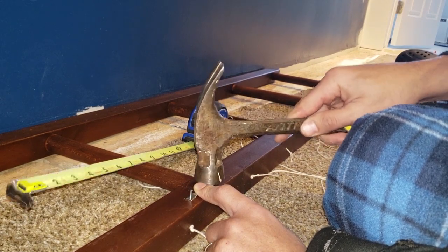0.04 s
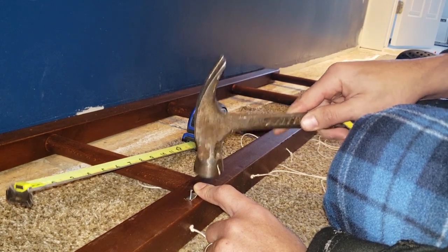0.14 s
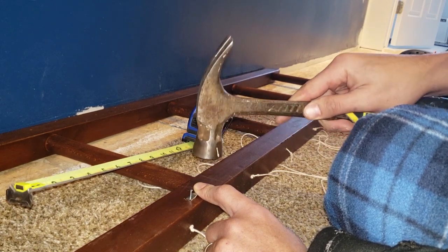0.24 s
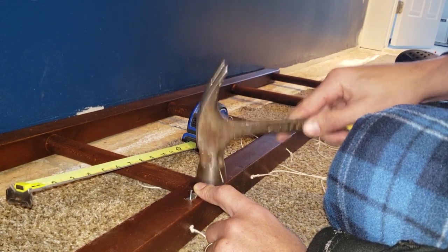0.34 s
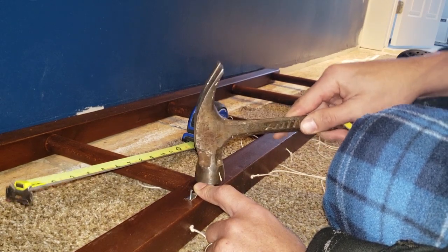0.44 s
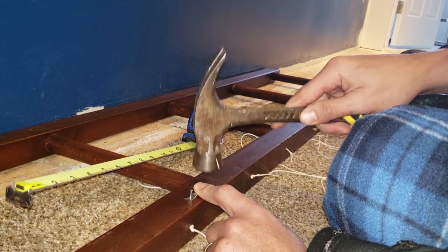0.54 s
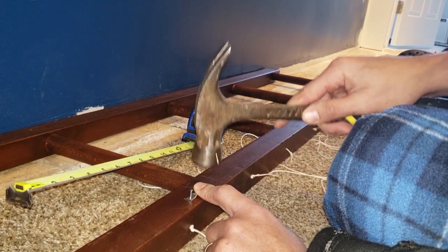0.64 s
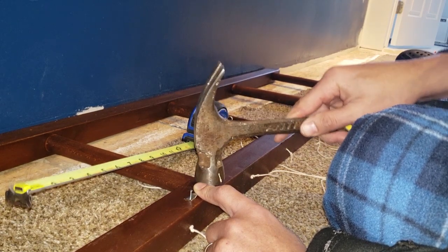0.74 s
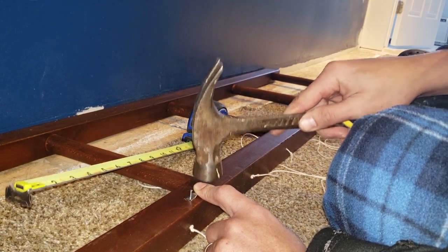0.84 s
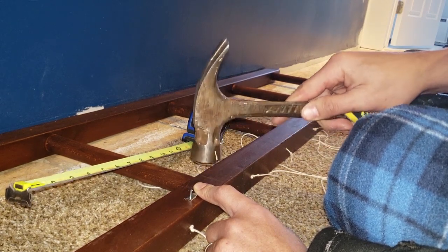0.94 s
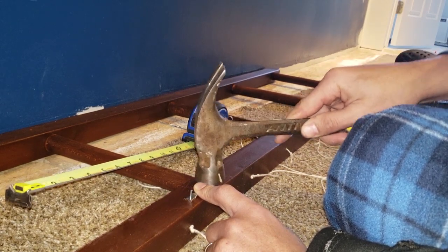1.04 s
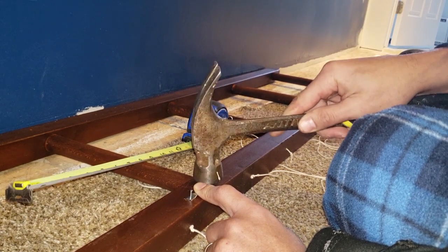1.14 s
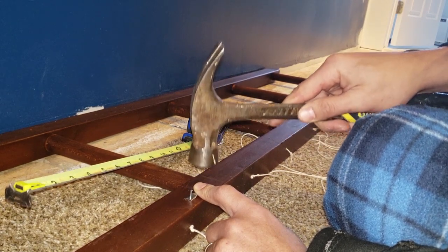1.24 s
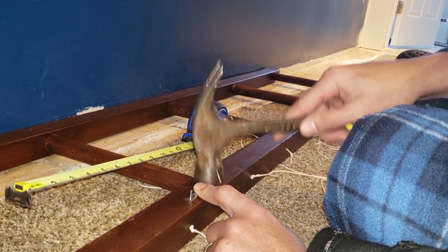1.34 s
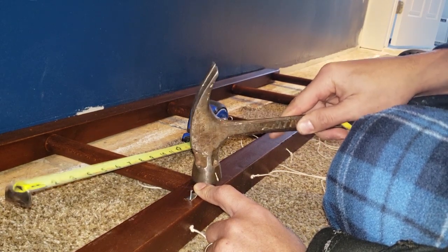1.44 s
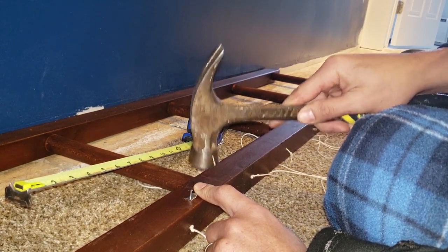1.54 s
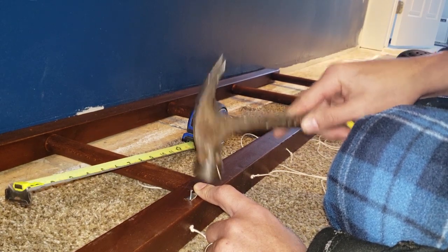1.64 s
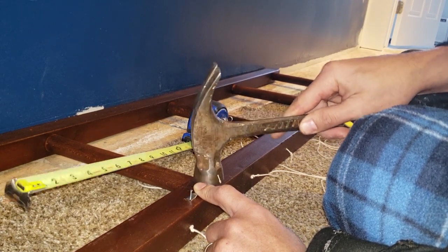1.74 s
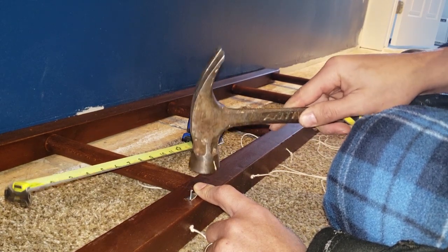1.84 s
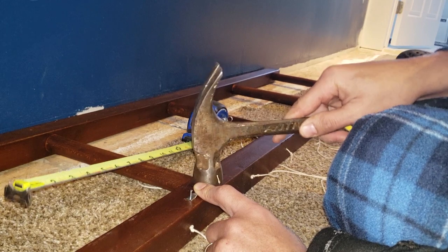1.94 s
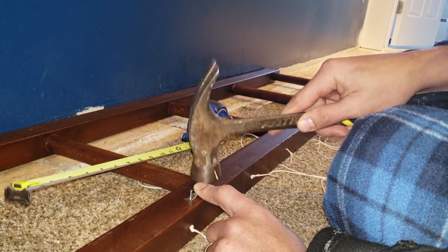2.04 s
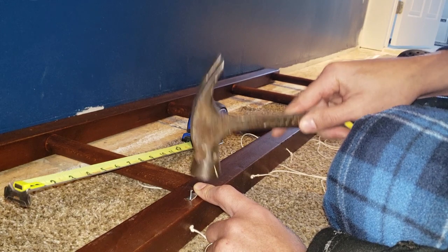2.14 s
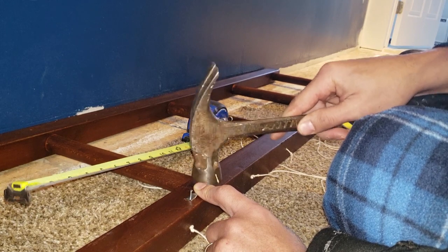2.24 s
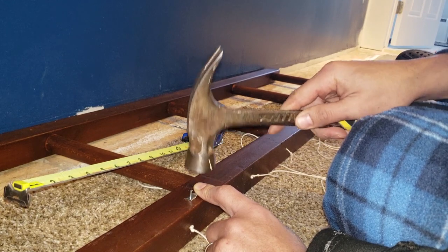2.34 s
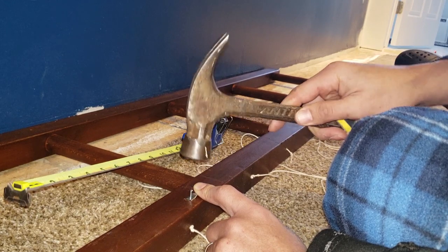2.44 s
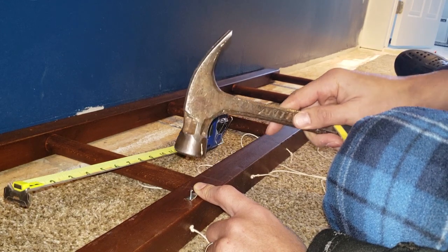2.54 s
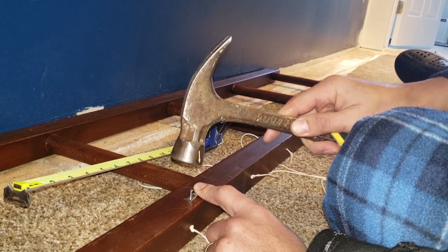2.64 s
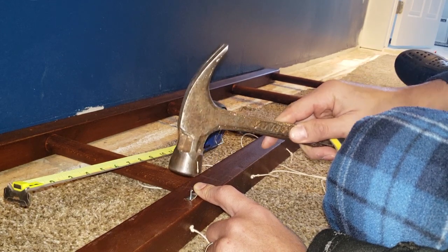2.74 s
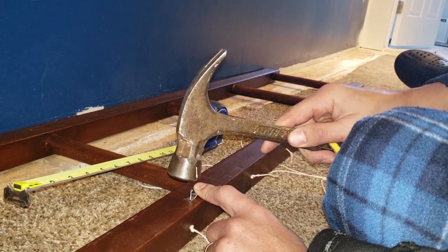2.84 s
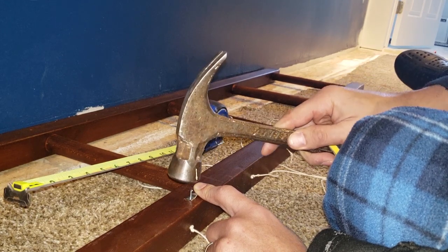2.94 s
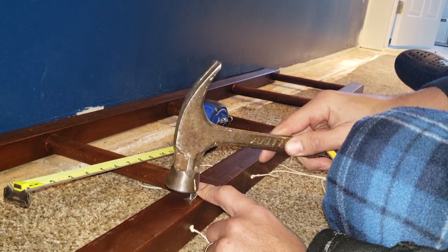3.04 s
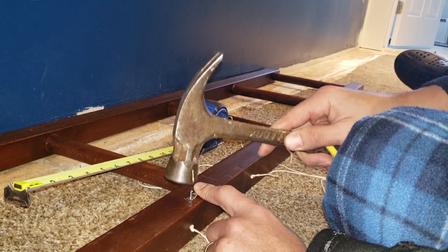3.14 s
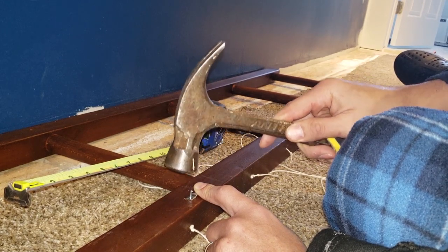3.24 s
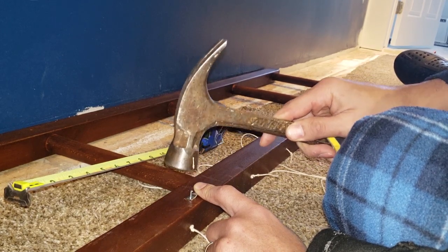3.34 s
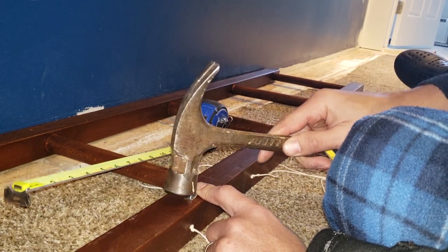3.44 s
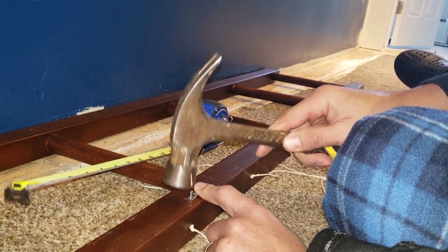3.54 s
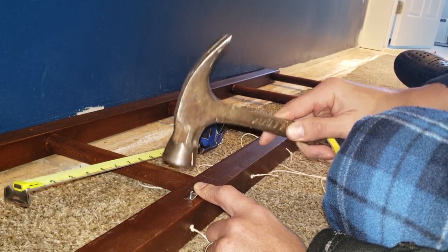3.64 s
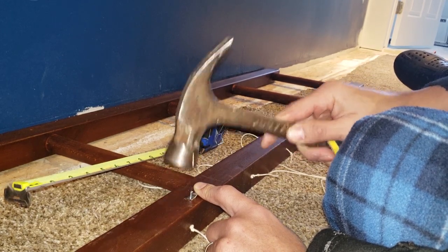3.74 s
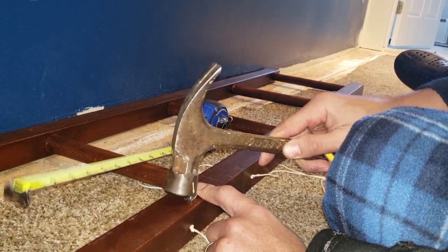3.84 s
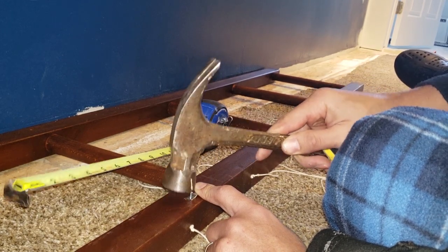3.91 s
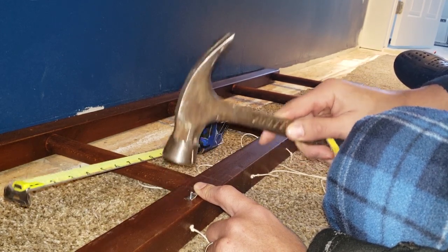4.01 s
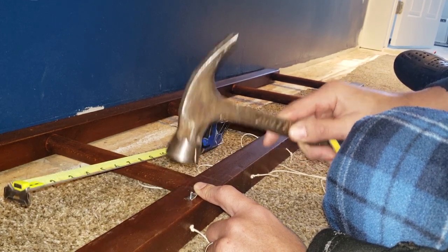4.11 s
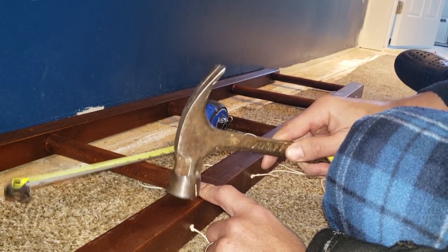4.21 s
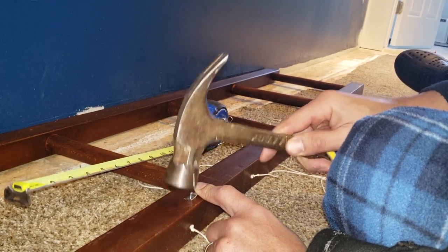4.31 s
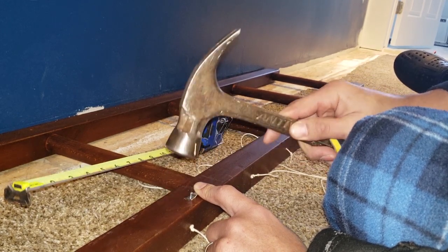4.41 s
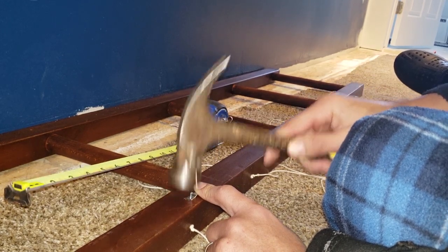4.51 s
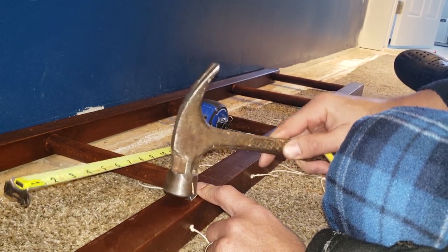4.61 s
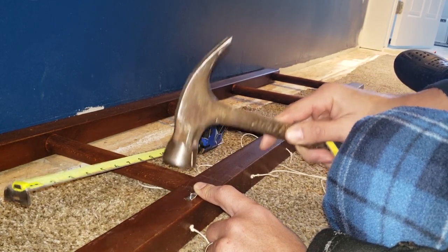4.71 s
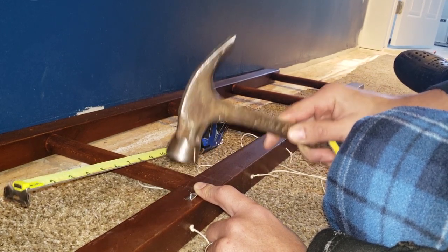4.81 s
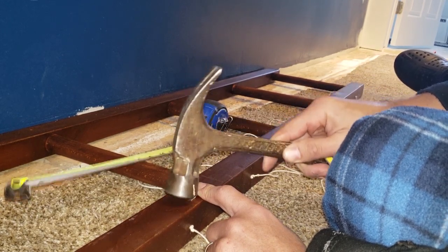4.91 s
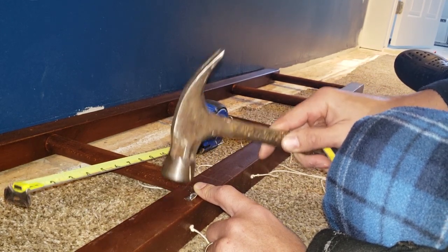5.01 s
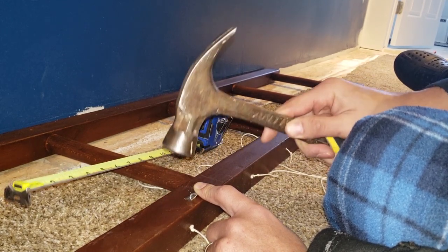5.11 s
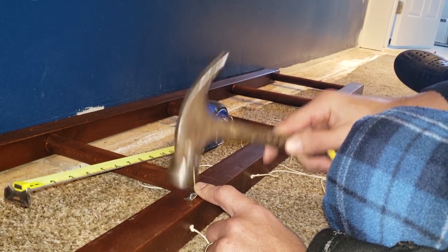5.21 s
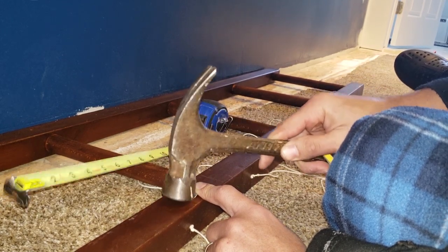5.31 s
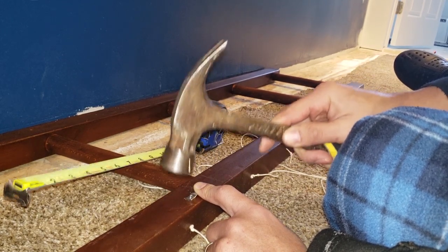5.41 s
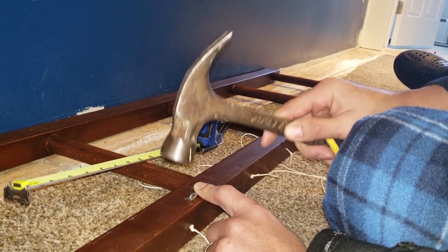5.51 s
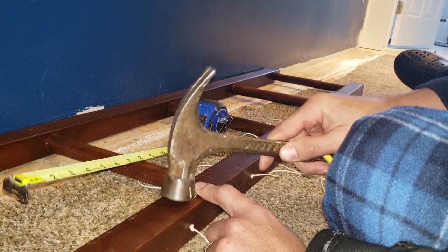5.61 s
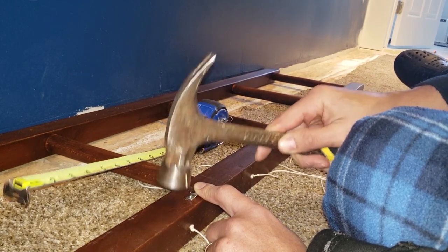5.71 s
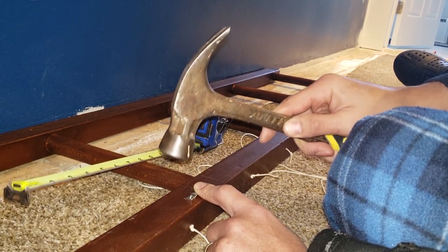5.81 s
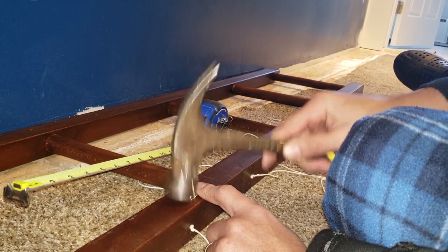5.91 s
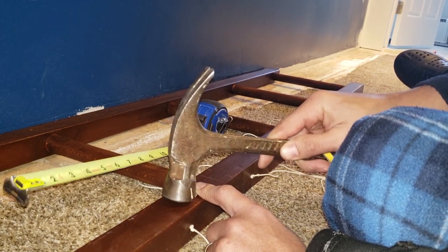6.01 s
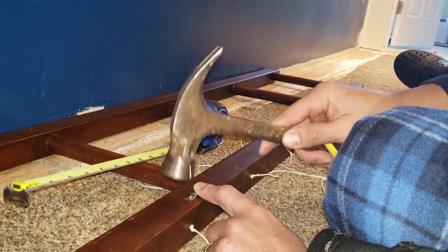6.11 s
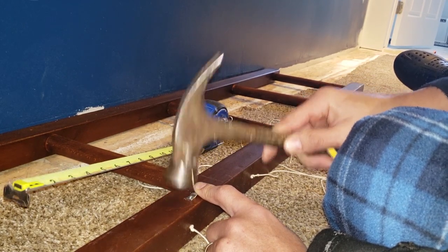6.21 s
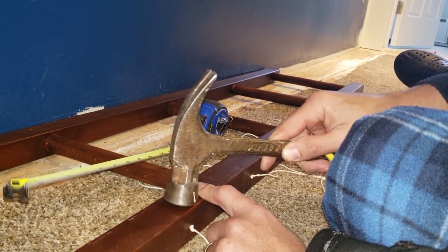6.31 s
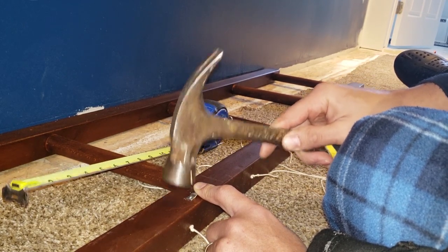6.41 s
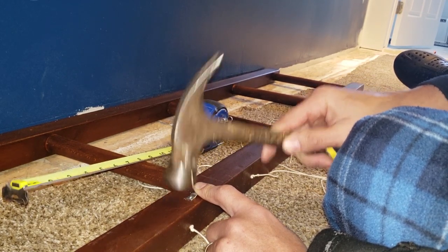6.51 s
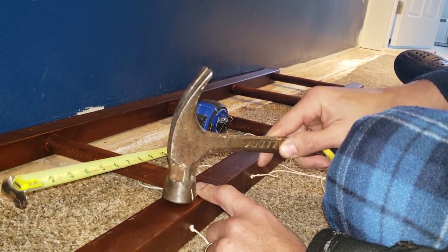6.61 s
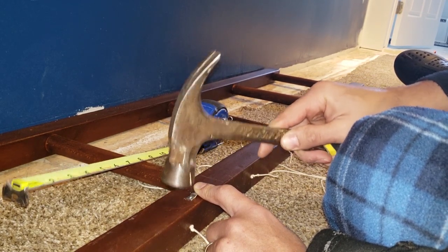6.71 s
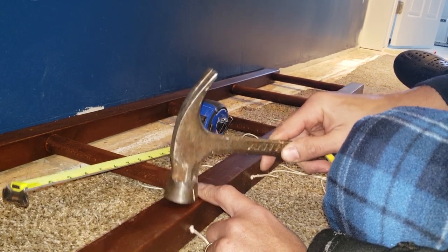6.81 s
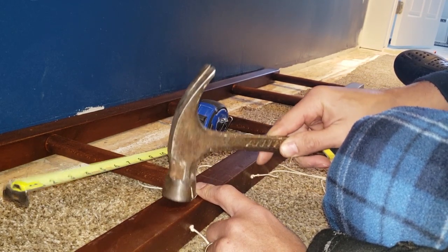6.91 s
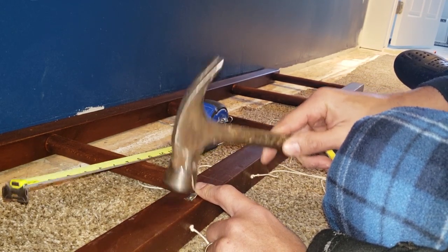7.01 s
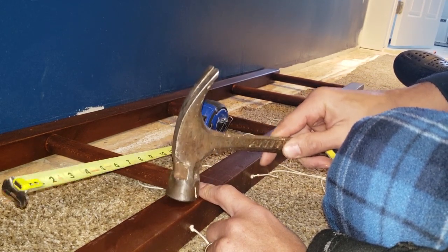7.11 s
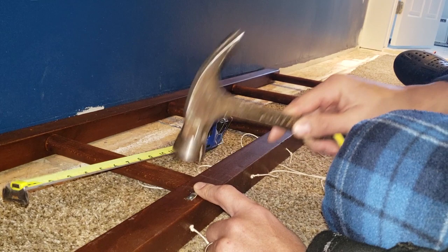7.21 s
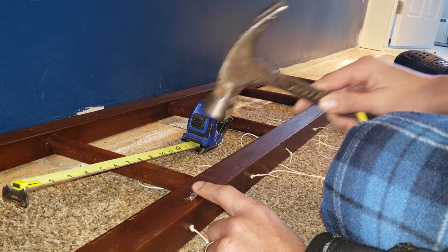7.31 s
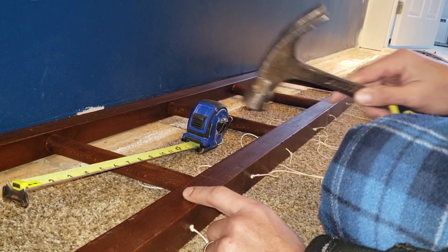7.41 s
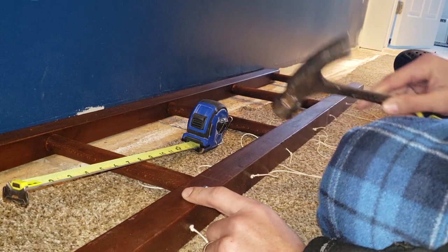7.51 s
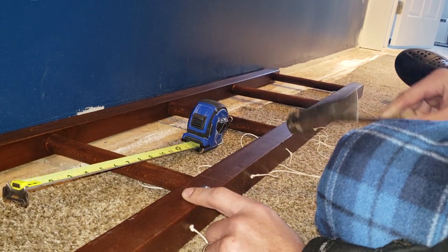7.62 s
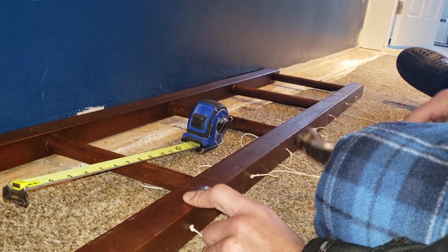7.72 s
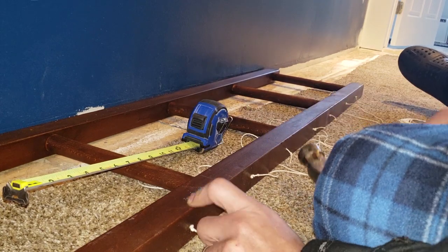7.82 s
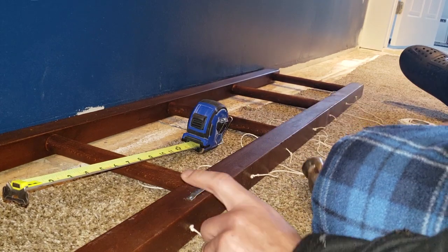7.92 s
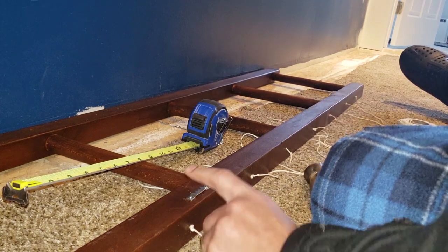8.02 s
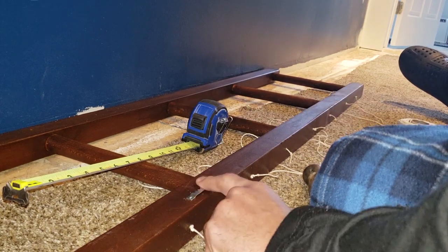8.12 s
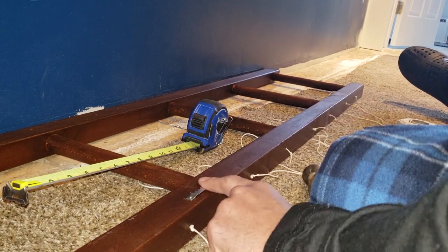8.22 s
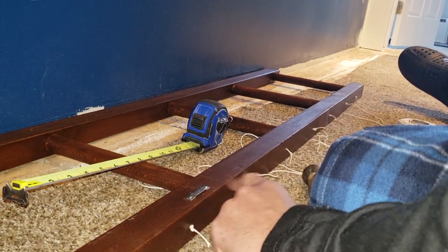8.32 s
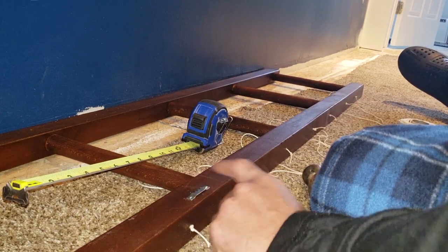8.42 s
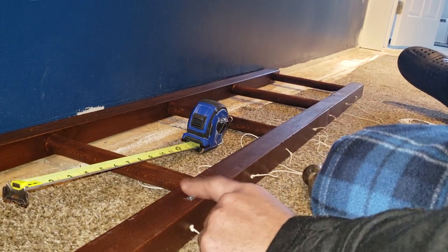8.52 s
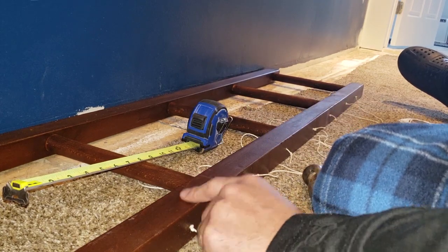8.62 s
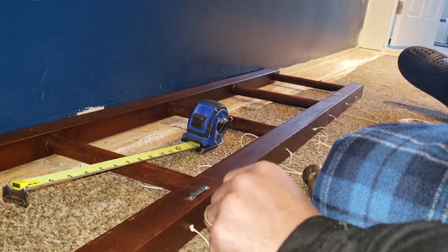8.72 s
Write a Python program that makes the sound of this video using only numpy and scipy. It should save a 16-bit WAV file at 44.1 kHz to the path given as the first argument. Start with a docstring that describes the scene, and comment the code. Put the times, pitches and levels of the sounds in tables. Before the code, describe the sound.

A hammer taps small nails into a wooden frame, heard close up in a small carpeted room with short reverberation. From the very start to about 2.2 seconds come eight firm, quick strikes, roughly three a second. Each combines a bright steel tick, a hollow wooden knock and a low thump through the floor, and the last few sound fuller as the nail seats. After a short pause, a barely audible tap at 3 seconds begins the second nail. The strikes grow louder until about 5 seconds, stay firm, quicken slightly and stop near 7.1 seconds. Between blows a steel tape measure chatters faintly, and in the second run the frame sometimes bounces back with a small extra knock. A faint low hum continues throughout. Around 8 and 8.5 seconds a shifting knee makes two very soft bumps on the floor.

```python
"""In a small carpeted room, a claw hammer taps two small nails through brackets into a wooden frame.
Each impact, heard from close by, ticks on the nail, excites the frame's modes and bounces the floor;
the knock grows fuller as the nail seats and passes more of the blow into the wood. The frame sometimes
rebounds and a steel tape lying across it chatters. The room reverberates over a low hum and a few
soft bumps of a shifting knee."""
import sys
import numpy as np
from scipy import signal
from scipy.fft import rfft, irfft, next_fast_len
from scipy.io import wavfile

SR = 44100
rng = np.random.default_rng(int(sys.argv[2]) if len(sys.argv) > 2 else 0)


def digitize_waveform(pressure):
    """Quantize a signal to 16-bit integers and store it at the path in sys.argv[1].

    Rows of a 2-D input are taken as channels; values are limited to [-1, 1].
    """
    field = np.atleast_2d(pressure).T
    bounded = np.clip(field, -1, 1)
    quanta = np.round(bounded * 32767).astype(np.int16)
    wavfile.write(sys.argv[1], SR, quanta)


N = 385875
RING_TIME = np.arange(SR // 2) / SR  # seconds since an impact
SECOND_NAIL_S = 2.8

# hammer blows: start_s, floor_weight_db, nail_contact_db
BLOWS = [(0.001, -17.5, -19), (0.394, -19, -18.5), (0.723, -17.5, -18), (1.072, -19, -18),
         (1.395, -17, -17.5), (1.71, -16, -17.5), (1.97, -19, -18), (2.206, -18.5, -17.5),
         (3.04, -43, -51.5), (3.452, -29, -37), (3.813, -22, -28.5), (4.188, -20, -26.5),
         (4.571, -18.5, -25.5), (4.913, -17.5, -21), (5.268, -16, -20), (5.615, -16.5, -20),
         (5.967, -17, -19.5), (6.289, -17, -17.5), (6.592, -16, -18.5), (6.854, -18, -16.5),
         (7.084, -19.5, -17)]
# modes of the frame, by where it is struck: pitch_hz, first_nail_db, second_nail_db, nail_home_db
FRAME_MODES = [(590, -27, -21, -17), (637, -17, -13, -15), (742, -19, -12, -16), (805, -18, -14, -11),
               (827, -15, -11, -9), (862, -9, -9, -12), (878, -14, -11, -7), (960, -19, -9, -9),
               (997, -13, -9, 0), (1046, -6, -8, -3), (1150, -7, -5, -10), (1200, -9, -8, -9),
               (1240, -6, -14, -9), (1268, -6, -11, -6), (1310, -5, -16, -13), (1347, 0, -5, -10),
               (1470, -18, -18, -14), (1627, -13, -12, -11), (1703, -7, -11, -12), (1749, -1, -3, -9),
               (1785, -10, -12, -13), (1831, -9, -15, -10), (2030, -11, -14, -16), (2229, -5, -8, -13),
               (2300, -12, -9, -10), (2493, -19, -12, -16), (2684, -10, -10, -12), (2815, -19, -19, -20),
               (4587, -20, -18, -20), (5100, -31, -29, -24)]
# coherence of the left and right channels: frequency_hz, correlation
COHERENCE = [(60, 1), (125, 0.93), (250, 0.65), (500, 0.86), (1000, 0.15), (2000, -0.2), (4000, 0.05),
             (12000, 0.002)]


def hammering(flight_s=0.00099, firm_db=-20.5):
    """Impact excitation: each blow drives nail, frame, floor and room; softer contact sounds duller."""
    # the frame falling back after a blow: start_s, level_db
    rebounds = [(4.613, -28.5), (4.954, -30), (5.317, -27.5), (5.661, -34), (6.009, -25.5), (6.618, -23),
                (7.105, -30.5)]
    # spectra of the wood's knock and crack, the steel's tick and the room's boom: frequency_hz, density_db
    knock_spectrum = [(200, -8), (430, -7.5), (600, -8), (690, -6.5), (850, 1), (1030, -3), (1280, -3.5),
                      (1520, -4.5), (1780, -0.5), (1950, -9.5), (2300, -7.5), (3200, -34.5)]
    crack_spectrum = [(1200, -18.5), (1950, 3.5), (2350, 2.5), (2700, 3), (3300, -6), (3800, -7),
                      (4150, -9.5), (4600, -8.5), (5600, -15.5), (6600, -19), (8000, -30), (12000, -39)]
    tick_spectrum = [(2000, -18), (4000, -5.5), (6000, 3), (7500, -7), (9000, -7.5), (10800, -9.5),
                     (12500, 0.5), (14000, -1), (15800, -3.5)]
    boom_spectrum = [(25, -18), (45, -8), (62, 3), (80, -5.5), (115, -6), (170, -17), (260, -17),
                     (450, -25), (1500, -74.5)]
    out = np.zeros((2, N))
    grain, modes = noise(knock_spectrum), frame_modes()  # common to all blows
    crack_envelope, tick_envelope, boom_envelope = np.zeros((3, N))
    for start_s, weight_db, contact_db in BLOWS:
        seated, resonance_hz, nail_db = nail(start_s)
        force_db = contact_db - firm_db
        # seating shifts the sound from floor and steel into the wood
        thump_db = weight_db - 3 * seated
        wood_db = contact_db + 4.5 * seated
        crack_db = contact_db - 4.5 + 0.34 * force_db + 3.5 * seated
        tick_db = contact_db + nail_db + 0.47 * force_db - 2.5 * seated
        knock = wood_knock(grain + 0.84 * noise(knock_spectrum), resonance_hz)
        ring = frame_ring(modes, start_s > SECOND_NAIL_S, seated)
        wood = first_wave(seated) + knock + ring + main_resonance(resonance_hz)
        arrival_s = start_s + flight_s
        add(out, arrival_s, undb(wood_db) * wood)
        add(out, arrival_s, undb(thump_db) * floor_thump())
        add(out, arrival_s, undb(contact_db) * steel_ring())
        add(crack_envelope, arrival_s, undb(crack_db) * wood_crack())
        add(tick_envelope, arrival_s, undb(tick_db) * steel_tick())
        add(boom_envelope, arrival_s, undb(thump_db - 17) * (fade(t60=0.91) - fade(t60=0.027)))
    for start_s, level_db in rebounds:
        knock = wood_knock(grain + noise(knock_spectrum), resonance_hz=1300, direct_db=10.5, room_db=0)
        add(out, start_s, undb(level_db) * rise(0.00059) * knock)
        add(crack_envelope, start_s, undb(level_db - 4) * rise(0.00055) * wood_crack())
    out += crack_envelope * noise(crack_spectrum, N)
    out += tick_envelope * noise(tick_spectrum, N)
    return out + boom_envelope * noise(boom_spectrum, N)


def nail(time_s, loose_depth=0.069):
    """Coupling to the wood grows with depth: gives the nail's seating (0-1), resonance and tick level."""
    # the two nails: seating_s, driven_s, final_depth, loose_hz, driven_hz, tick_db
    nails = [(1.3, 1.85, 1, 1345, 1010, -12), (6.0, 6.85, 0.78, 1015, 1341, -8.5)]
    seating_s, driven_s, final_depth, loose_hz, driven_hz, tick_db = nails[int(time_s > SECOND_NAIL_S)]
    seated = np.interp(time_s, [seating_s, driven_s], [loose_depth, final_depth])
    resonance_hz = np.interp(time_s, [seating_s, driven_s], [loose_hz, driven_hz])
    return seated, resonance_hz, tick_db


def first_wave(seated):
    """The wood radiates a short pressure pulse, lower and stronger as the nail seats."""
    pitch_hz, cycles = 1400 - 350 * seated, 2
    t = np.maximum(stereo_time(lag_s=0.000053), 0)
    envelope = np.exp(-(t * pitch_hz / cycles) ** 2)
    return -undb(1 + 8 * seated) * np.sin(2 * np.pi * pitch_hz * t) * envelope


def wood_knock(grain, resonance_hz, peak_db=7, half_width_hz=75, direct_db=3, room_db=-6):
    """Modal overlap: the frame's dense, damped modes merge into noise with a resonant peak."""
    dense = unit_rms(colour(grain, lambda hz: peak_db / (1 + ((hz - resonance_hz) / half_width_hz) ** 2)))
    return dense * (undb(direct_db) * fade(t60=0.04) + undb(room_db) * fade(t60=0.4))


def main_resonance(pitch_hz, level_db=1):
    """The strongest resonance under the nail builds up, decays and gives the knock its pitch."""
    tone = np.sin(2 * np.pi * pitch_hz * stereo_time(lag_s=0.00023))
    return -undb(level_db) * tone * rise(0.0016) * fade(t60=0.11)


def frame_modes():
    """Free vibration: one damped sine a mode, closer in phase between channels where coherence is high."""
    pitch_hz = np.transpose(FRAME_MODES)[0]
    left, offset = rng.uniform(-np.pi, np.pi, (2, len(pitch_hz)))
    right = left + offset * (1 - np.clip(along(COHERENCE, pitch_hz), 0, 1))
    phases = np.array([left, right])[:, :, None]
    return np.sin(2 * np.pi * pitch_hz[:, None] * RING_TIME + phases) * fade(t60=0.28)


def frame_ring(modes, second_nail, seated, level_db=-10.8, seated_db=5, scatter_db=2):
    """Modal superposition: the striking point weights the modes; a seated nail drives them harder."""
    _, first_db, second_db, home_db = np.transpose(FRAME_MODES)
    loose_db = second_db if second_nail else first_db
    mode_db = (1 - seated) * loose_db + seated * (home_db + seated_db)
    return undb(mode_db + level_db + scatter_db * rng.standard_normal(len(mode_db))) @ modes


def wood_crack(direct_db=4, room_db=-4):
    """Envelope of the blow's bright transient: direct sound, then reverberation."""
    return undb(direct_db) * fade(t60=0.038) + undb(room_db) * fade(t60=0.34)


def steel_tick(snap_s=0.0017, snap_db=13, direct_db=7, room_db=-3):
    """Envelope of hard contact, steel on steel: a touch, the nail's snap forward, reverberation."""
    touch = undb(direct_db) * fade(t60=0.0082) + undb(room_db) * fade(t60=0.25)
    return rise(0.00073) * touch + undb(snap_db) * fade(t60=0.005, start_s=snap_s)


def steel_ring():
    """Hammer and nail ring faintly in free vibration, at a different phase in each channel."""
    # modes of the steel: pitch_hz, level_db, t60_s
    modes = [(2740, -19, .18), (4490, -26, .2), (4660, -26, .2), (6690, -42, .7)]
    phases = rng.uniform(-np.pi, np.pi, (len(modes), 2, 1))
    return sum(undb(db) * np.sin(2 * np.pi * hz * RING_TIME + phase) * fade(t60)
               for (hz, db, t60), phase in zip(modes, phases))


def floor_thump(level_db=4, sink_s=0.0092, detune=0.013):
    """A load sinks into the carpet; the floor's modes pass their low point in phase and swing on."""
    # modes of the floor: pitch_hz, level_db, full_swing_s
    modes = [(65.2, 0, 0.027), (81.2, -8, 0.025), (112.3, -8.5, .015), (138, -10.5, 0.003),
             (156, -12, 0.0083), (225.8, -26, 0.042), (250.6, -18, .016), (280.4, -20, 0.015)]
    tuning = 1 + detune * rng.standard_normal()
    radians_per_hz = 2 * np.pi * tuning * (stereo_time(lag_s=0.000088) - sink_s)
    swing = sum(undb(db) * np.cos(hz * radians_per_hz) * swell(peak_s) for hz, db, peak_s in modes)
    return -undb(level_db) * swing


def tape_chatter(bounce_s=0.038, jitter_s=0.001, loss_db=7, scatter_db=0.5, grit_db=3.3, room_db=-8):
    """Inelastic bouncing: the tossed steel tape lands in four fading slaps, each a run of contacts."""
    # landings of the tape: start_s, level_db
    landings = [(0.139, -33.5), (0.492, -34.5), (0.818, -30), (1.201, -41), (1.532, -34.5), (1.85, -34),
                (3.505, -37), (3.87, -30), (3.998, -41.5), (4.335, -33.5), (4.673, -39.5), (4.795, -36.5),
                (5.06, -31), (5.424, -33.5), (5.727, -27), (6.121, -31), (6.47, -39), (6.742, -33.5),
                (7.043, -41), (7.258, -42.5)]
    # spectrum of the thin blade: frequency_hz, density_db
    blade_spectrum = [(800, -1), (2200, 2), (3500, -6), (5000, -2), (6500, -1.5), (8500, -11), (10500, -14),
                      (13000, -4), (15800, -7.5)]
    slaps = np.zeros(N)
    slap = rise(0.0016) * (fade(t60=0.017) + undb(room_db) * fade(t60=0.3))
    for start_s, level_db in landings:
        for bounce, (late, strong) in enumerate(rng.standard_normal((4, 2))):
            slap_db = level_db - 6.5 - bounce * loss_db + scatter_db * strong
            add(slaps, start_s + bounce * (bounce_s + jitter_s * late), undb(slap_db) * slap)
    contacts = np.repeat(rng.standard_normal(N // 90 + 1), 90)[:N]  # about 2 ms each
    return np.hypot(slaps, tape_jangle()) * undb(grit_db * contacts) * noise(blade_spectrum, N)


def tape_jangle(level_db=-25, threshold_db=-36):
    """Envelope of forced rattling: the bouncing frame shakes the tape, less as the nail seats."""
    envelope = np.zeros(N)
    for start_s, weight_db, _ in BLOWS:
        if weight_db > threshold_db:
            looseness = 1 - nail(start_s)[0]
            add(envelope, start_s, looseness * undb(weight_db + level_db) * rise(0.016) * fade(t60=0.6))
    return envelope


def knee_bumps():
    """A shifting knee softly excites the modes of the floor."""
    # bumps on the floor: start_s, level_db
    bumps = [(2.975, -55), (8.025, -47), (8.545, -53)]
    out = np.zeros((2, N))
    for start_s, level_db in bumps:
        add(out, start_s, undb(level_db) * floor_thump())
    return out


def house_hum(noise_db=-57.5):
    """Stationary low noise carries two tones that waver by slow phase modulation."""
    # spectrum of the hum: frequency_hz, density_db
    spectrum = [(30, -30.5), (60, -3.5), (82, -3.5), (108, -23.5), (158, -7), (220, -24), (320, -15),
                (420, -27), (650, -39.5), (1050, -35), (1500, -38), (2250, -27), (3200, -53.5),
                (16000, -65)]
    # tones in the hum: pitch_hz, rms_db
    tones = [(82, -61.5), (157, -66)]
    t = np.arange(N) / SR
    out = undb(noise_db) * noise(spectrum, N)
    for pitch_hz, rms_db in tones:
        waver = np.interp(t, np.linspace(0, t[-1], 60), np.cumsum(rng.standard_normal(60)))
        out += undb(rms_db) * np.sqrt(2) * np.sin(2 * np.pi * pitch_hz * t + waver)
    return out


def noise(spectrum, size=len(RING_TIME)):
    """Partially coherent stereo noise of a given spectrum, alike left and right in the bass."""
    hz = np.fft.rfftfreq(size, 1 / SR)
    correlation = np.clip(along(COHERENCE, hz), -0.99, 0.99)
    mid, side = rfft(rng.standard_normal((2, size)))
    pair = mid * np.sqrt(1 + correlation) + np.array([[1], [-1]]) * side * np.sqrt(1 - correlation)
    return unit_rms(irfft(pair * undb(along(spectrum, hz)), size))


def stereo_time(lag_s):
    """Path difference: time axes for a wave that reaches the left channel first."""
    return RING_TIME - np.array([[0], [lag_s]])


def rise(rise_s):
    """Smooth onset of a contact of finite duration."""
    return 1 - np.exp(-(RING_TIME / rise_s) ** 2)


def fade(t60, start_s=0):
    """Exponential damping: 60 dB down in t60 seconds."""
    return (RING_TIME >= start_s) * np.exp(-np.log(1000) * np.maximum(RING_TIME - start_s, 0) / t60)


def swell(peak_s):
    """Inertia: the envelope of a heavy body that swings up and dies away."""
    return (RING_TIME / peak_s * np.exp(1 - RING_TIME / peak_s)) ** 2


def colour(x, db_at):
    """Zero-phase filtering by a gain in dB given as a function of frequency."""
    hz = np.fft.rfftfreq(x.shape[-1], 1 / SR)
    return irfft(rfft(x) * undb(db_at(hz)), x.shape[-1])


def along(points, hz):
    """Interpolation of (frequency_hz, value) points on a logarithmic frequency axis."""
    points_hz, values = np.transpose(points)
    return np.interp(np.log(np.maximum(hz, 1)), np.log(points_hz), values)


def undb(db):
    """Decibels to amplitude ratio."""
    return 10 ** (np.asarray(db) / 20)


def unit_rms(x):
    """Normalisation to unit power."""
    return x / np.sqrt(np.mean(x ** 2))


def add(out, start_s, x):
    """Superposition of x on out from start_s."""
    i = max(int(start_s * SR), 0)
    out[..., i:i + x.shape[-1]] += x[..., :max(N - i, 0)]


def scene(ceiling_s=0.0212, ceiling_db=-12):
    """Direct sound and a ceiling reflection; level differences set the knock right and the steel left."""
    # stereo balance: frequency_hz, left_minus_right_db
    balance = [(60, -1.7), (250, 0.5), (500, 1), (1000, -1.5), (2200, -3), (4500, 2.5), (14000, 3.5)]
    impacts = hammering() + tape_chatter()
    reflection = signal.sosfilt(signal.butter(2, 500, "high", fs=SR, output="sos"), impacts)
    add(impacts, ceiling_s, undb(ceiling_db) * reflection)
    padded = np.pad(impacts, ((0, 0), (0, next_fast_len(N + SR // 2, True) - N)))
    panned = colour(padded, lambda hz: np.array([[1], [-1]]) * along(balance, hz) / 2)[:, :N]
    return panned + house_hum() + knee_bumps()


def record(dry):
    """Soft saturation and band limiting: the microphone rounds the peaks and cuts the top."""
    top_hz = 15900
    return signal.sosfilt(signal.ellip(8, 0.2, 70, top_hz, fs=SR, output="sos"), np.tanh(dry))


dry = scene()
out = record(dry)
digitize_waveform(out)
```